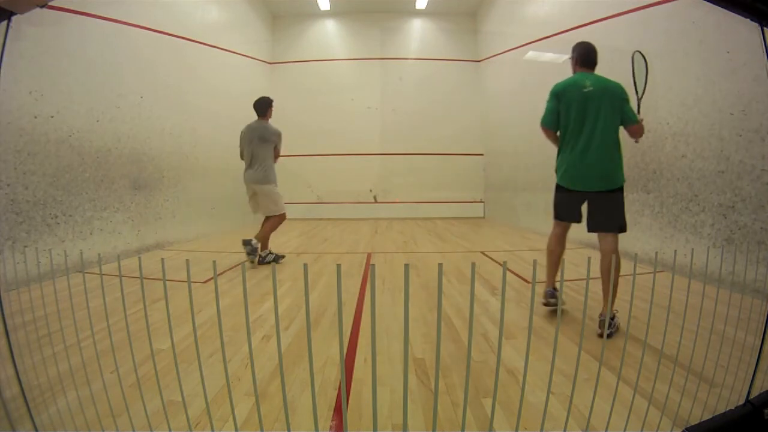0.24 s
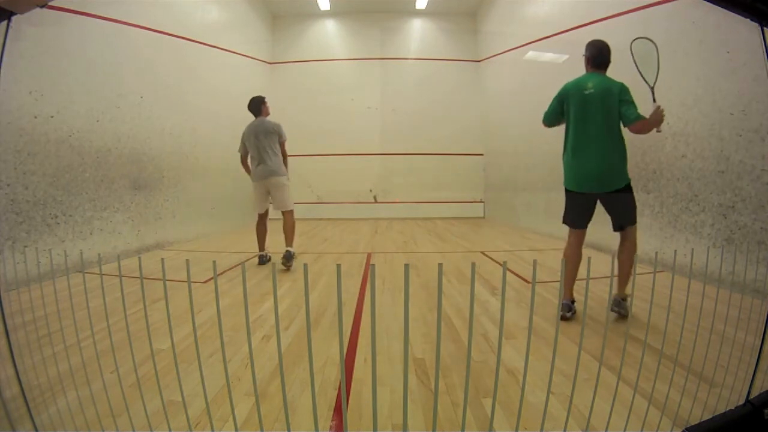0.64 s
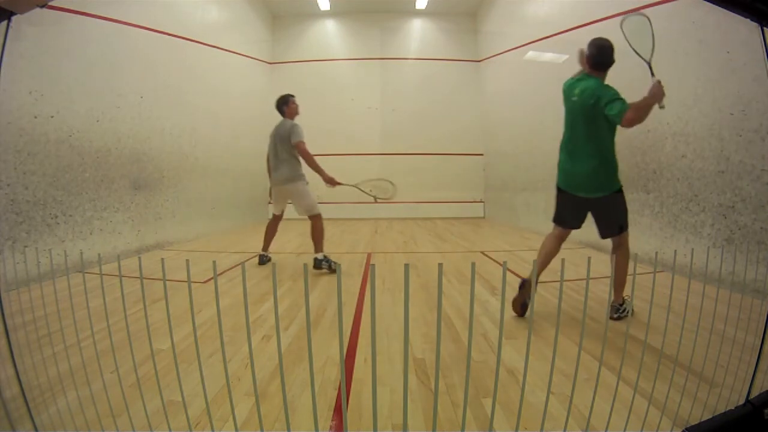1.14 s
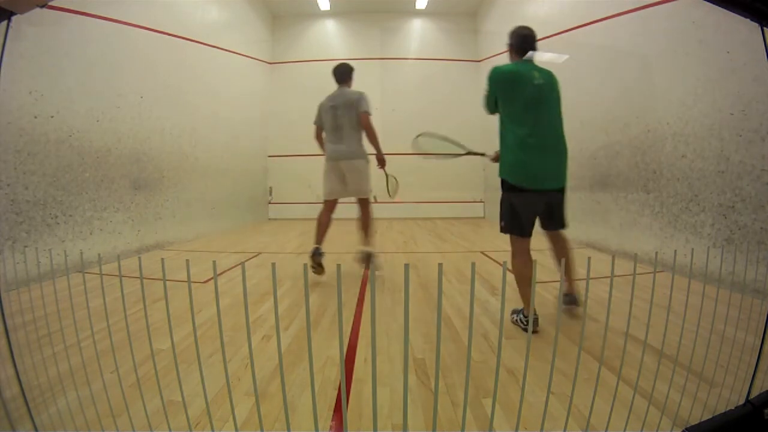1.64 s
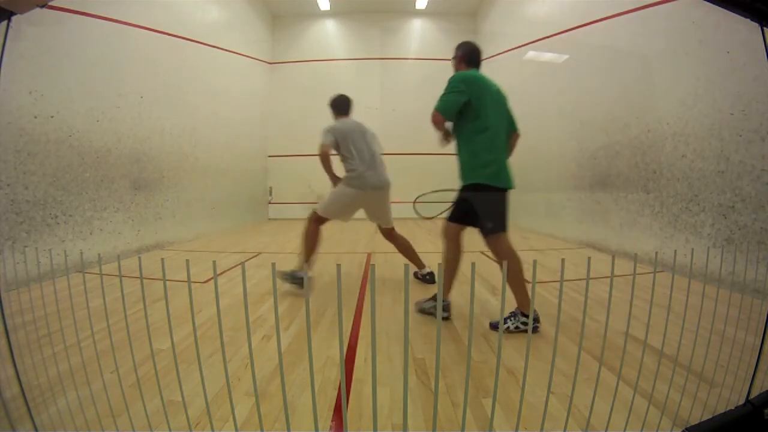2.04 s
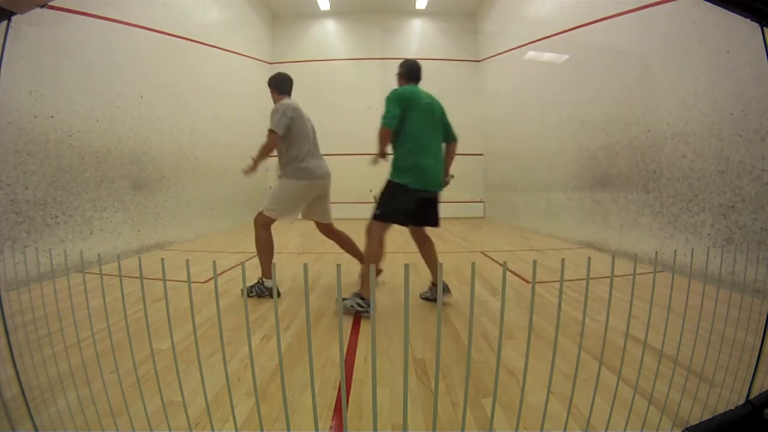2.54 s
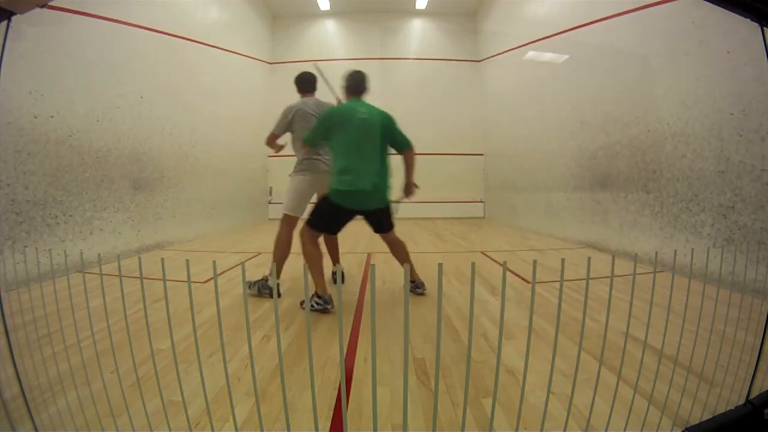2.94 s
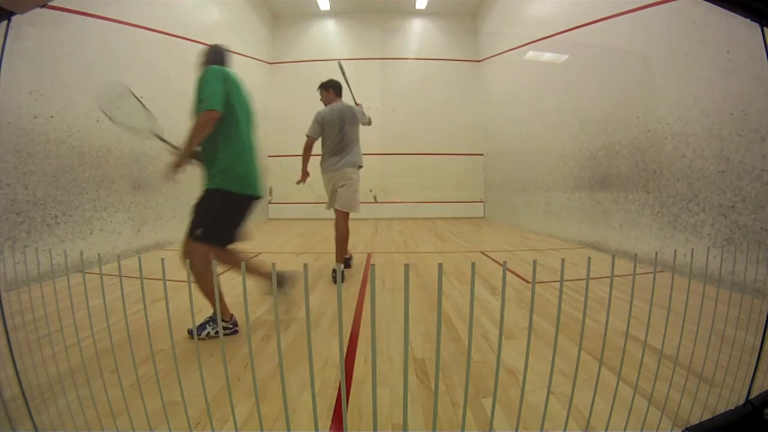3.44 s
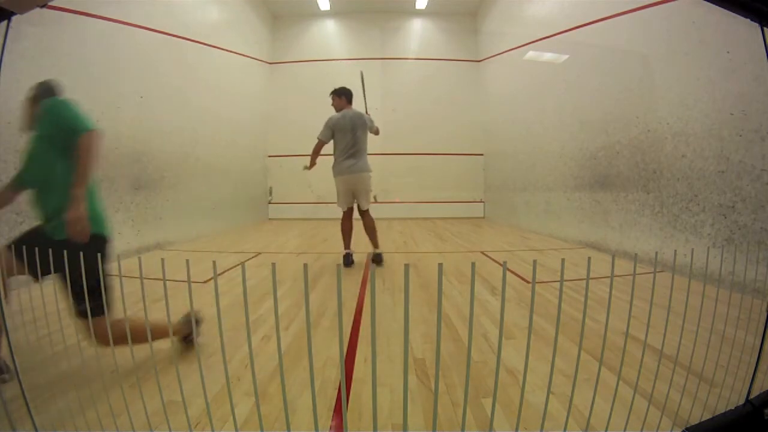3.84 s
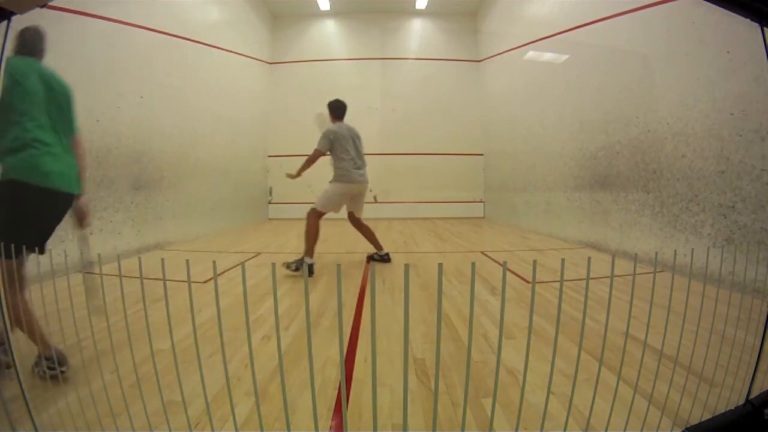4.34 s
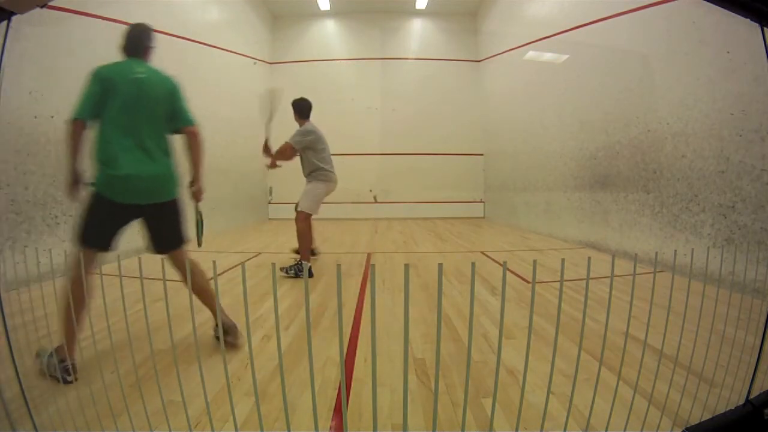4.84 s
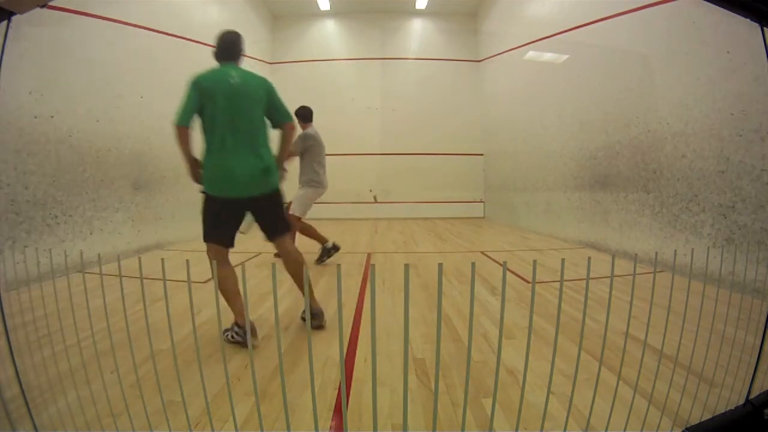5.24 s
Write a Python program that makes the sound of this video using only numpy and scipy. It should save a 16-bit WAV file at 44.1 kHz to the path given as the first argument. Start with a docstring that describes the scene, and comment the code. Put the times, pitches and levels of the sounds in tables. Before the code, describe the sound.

Squash rally in a hard, echoing court: ringing racket hits, loud wall smacks, shoe squeaks and floor thuds over dull ventilation, boxy sound.

```python
"""A hard, enclosed squash court during a rally, heard from behind the back wall by a small camera in a plastic case.
Racket strokes ring at string and frame resonances; each is followed by the ball's smack on the front wall.
Shoes thud as filtered noise bursts on the wooden floor and squeak as gliding stick-slip notes.
Blows and shoes excite a diffuse tail that dies over two to three seconds, above a steady noise of ventilation.
The case adds a honking resonance, and a slow sample-and-hold converter adds a glassy mirrored treble."""
import sys
import numpy as np
from scipy import signal
from scipy.fft import rfft, irfft
from scipy.io import wavfile
from scipy.ndimage import uniform_filter1d

SR = 44100
rng = np.random.default_rng(int(sys.argv[2]) if len(sys.argv) > 2 else 0)


def log_audio(samples):
    """Write samples as a 16-bit WAV file to the path given in sys.argv[1]."""
    # one column per channel
    frames = np.atleast_2d(samples).T
    # limit to full scale, then quantise
    limited = np.clip(frames, -1, 1)
    pcm = np.round(limited * 32767).astype(np.int16)
    wavfile.write(sys.argv[1], SR, pcm)


N = 242550
THUD_HZ, THUD_WIDTH_HZ = 314, 395  # the ball's hollow thud
COURT_WIDTH_M, COURT_LENGTH_M = 6.2, 10.1
SOUND_M_S = 343
SPECTRUM_SIZE = 2 ** 19
FREQ = np.maximum(np.arange(SPECTRUM_SIZE // 2 + 1) * SR / SPECTRUM_SIZE, 1)
TIME = np.arange(N) / SR


def undb(db):
    """Logarithmic level: decibels become an amplitude gain."""
    return 10 ** (np.asarray(db) / 20)


def curve(points, hz=FREQ):
    """Logarithmic pitch scale: join (Hz, value) points by straight lines over log frequency."""
    point_hz, value = np.transpose(points)
    return np.interp(np.log(hz), np.log(point_hz), value)


def bump(hz, width_hz, db):
    """Resonance: a peak (or dip) in dB that falls to half its height at half the width from its centre."""
    return db / (1 + (2 * (FREQ - hz) / width_hz) ** 2)


def tilt(db_per_octave):
    """Spectral slope: brighten or dull the treble above 2 kHz."""
    return db_per_octave * np.log2(np.maximum(FREQ / 2000, 1))


def colour(x, db):
    """Minimum phase: folding the cepstrum makes a causal filter with the given dB curve."""
    cepstrum = irfft(np.log(undb(db[::128])))
    half = len(cepstrum) // 2
    cepstrum[1:half] *= 2
    cepstrum[half + 1:] = 0
    response = irfft(np.exp(rfft(cepstrum)))
    return signal.oaconvolve(x, response)[:len(x)]


def add(out, start_s, x):
    """Superposition: mix x into out from start_s."""
    i = max(int(start_s * SR), 0)
    out[i:i + len(x)] += x[:N - i]


def ventilation():
    """Broadband flow noise: white noise shaped into a dull, steady rush of air."""
    # spectrum of the air noise: hz, level_db
    air = [(20, -44), (45, -35), (90, -31.5), (160, -33), (300, -44), (600, -45.5), (1200, -55),
           (2400, -58.5), (5500, -55.5)]
    return colour(rng.standard_normal(N), curve(air))


def reverb(build_s):
    """Diffuse reverberation: random echoes thicken with time and each band decays at its own rate."""
    # reverberation time of the court by band: hz, t60_s
    court_t60 = [(100, 2.9), (350, 1.96), (900, 2.86), (2200, 2.42), (3800, 2.2), (6000, 1.7)]
    t = TIME[:2 ** 17]
    # sparse pulses at first, then dense, at constant average power
    chance = np.minimum(.1 + (t / .25) ** 2, 1)
    signs = np.sign(rng.standard_normal(len(t)))
    present = rng.random(len(t)) < chance
    echoes = rfft(signs * present / np.sqrt(chance))
    hz = np.maximum(np.arange(len(echoes)) * SR / len(t), 1)
    centres, t60s = np.transpose(court_t60)
    tail = 0
    # each row of the identity opens one band, crossfading into its neighbours
    for share, t60 in zip(np.eye(len(centres)), t60s):
        rate = np.log(1000) / t60
        band = irfft(echoes * np.interp(np.log(hz), np.log(centres), share))
        tail = tail + band * np.exp(-rate * t) * np.sqrt(2 * rate / SR)
    return tail * (1 - np.exp(-t / build_s))


def arrivals(straight_db, across_db, along_db, count=2):
    """Specular reflection: (delay_s, level_db) of straight, near-surface and fluttering paths."""
    near_bounce_s, near_bounce_db = .0065, -7  # against the straight path
    flutter_db = -1.5  # change with each further trip between facing walls
    paths = [(0, straight_db), (near_bounce_s, straight_db + near_bounce_db)]
    for k in range(count):
        paths.append(((k + 1) * COURT_WIDTH_M / SOUND_M_S, across_db + k * flutter_db))
        paths.append(((k + 1) * 2 * COURT_LENGTH_M / SOUND_M_S, along_db + k * flutter_db))
    return paths


def blow(paths, build_s, surge_db, surge_s=0.029, smear_s=0.0022):
    """Room impulse response: a few brief arrivals, a surge of early echoes and the long tail."""
    sound = reverb(build_s)
    sound *= 1 + undb(surge_db) * np.exp(-TIME[:len(sound)] / surge_s)
    t = TIME[:SR // 50]
    for delay_s, db in paths:
        # each arrival is a brief cluster of close reflections with a softened start
        cluster = rng.standard_normal(len(t)) * t * np.exp(-t / smear_s)
        add(sound, delay_s, undb(db) * cluster / np.linalg.norm(cluster))
    return sound


def rackets(echo_cluster_db=-12, echo_tilt_db=-2.0):
    """Impact and modal ringing: the ball pocks off strings and frame, and the front wall returns an echo."""
    # racket strokes: start_s, level_db, straight_path_db, string_ring_db, body_db, thud_db,
    # treble_tilt_db_per_octave, build_up_s, echo_delay_s, echo_db (against the stroke)
    strokes = [(0.040, -10.5, -24, 6.5, 0, 2.5, -1.5, 0.006, 0.038, 2.5),
               (1.461, 3.5, -24, 10.5, 5, -5.5, 0.5, 0.016, 0.059, 4),
               (2.535, 1.5, -15, 4.5, 9, 0, -3.5, 0.028, .044, -0.5),
               (3.959, -8, -11, 17, 11, 5, 3.5, 0.0016, .06, 1.5),
               (5.284, 5, -13, 6, 6, -5.5, -0.5, 0.0048, 0.032, .5)]
    # spectrum common to all strokes: hz, level_db
    stroke_colour = [(60, -5.5), (170, 4), (270, 3), (450, 1), (750, -0.5), (1350, 0), (1800, -1),
                     (2200, -2), (2550, -0.5), (2900, -0.5), (3500, -2.5), (4500, -5.5), (5200, -0.5),
                     (6000, -2)]
    string_hz, string_width_hz = 1068, 58
    body_hz, body_width_hz = 776, 170  # the racket's frame
    out = np.zeros(N)
    for (start_s, db, straight_db, ring_db, body_db, thud_db,
         tilt_db, build_s, echo_s, echo_db) in strokes:
        shape = curve(stroke_colour) + tilt(tilt_db)
        shape += bump(string_hz, string_width_hz, ring_db)
        shape += bump(body_hz, body_width_hz, body_db)
        shape += bump(THUD_HZ, THUD_WIDTH_HZ, thud_db)
        paths = arrivals(straight_db, across_db=-15.5, along_db=-16)
        stroke = blow(paths, build_s, surge_db=-1.5)
        add(out, start_s, undb(db) * colour(stroke, shape))
        # the long way round dulls the echo
        echo = blow([(0.0026, echo_cluster_db)], build_s=0.0037, surge_db=-3, surge_s=0.02)
        echo = colour(echo, shape + tilt(echo_tilt_db))
        add(out, start_s + echo_s, undb(db + echo_db) * echo)
    return out


def front_wall(thud_loss_per_db=0.68, surge_db=-3.0, surge_loss_per_db=1.8):
    """Panel resonance: each smack of the ball has one strong pitch and a band elsewhere that is no stronger."""
    # ball on the front wall: start_s, level_db, panel_hz, panel_width_hz, panel_db,
    # weak_band_hz, weak_band_db, treble_tilt_db_per_octave
    smacks = [(0.345, 1, 1053, 168, 10, 854, -4.5, 1), (1.679, 17.5, 770, 396, 6, 1417, -21.5, -4.5),
              (2.767, 9.5, 734, 170, 10.5, 1030, -9.5, 0.5), (4.381, -0.5, 1063, 175, 8.5, 850, -3, -1),
              (5.450, 11, 803, 203, 8.5, 1200, -6, 0)]
    # spectrum common to all smacks: hz, level_db
    smack_colour = [(60, -17), (180, -4.5), (260, 4.5), (400, 2.5), (750, 0), (1300, 1.5), (1700, 4),
                    (2200, 1), (3300, -1), (5500, -1)]
    out = np.zeros(N)
    paths = arrivals(straight_db=-12.0, across_db=-13, along_db=-15.5)
    for start_s, db, panel_hz, width_hz, panel_db, weak_hz, weak_db, tilt_db in smacks:
        shape = curve(smack_colour) + tilt(tilt_db)
        shape += bump(panel_hz, width_hz, panel_db)
        shape += bump(weak_hz, width_hz=275, db=weak_db)
        # slow, quiet balls thud and die back quickly; fast, loud ones crack and fill the court
        shape += bump(THUD_HZ, THUD_WIDTH_HZ, -thud_loss_per_db * db)
        sound = blow(paths, build_s=0.0057, surge_db=surge_db - surge_loss_per_db * db)
        add(out, start_s, undb(db) * colour(sound, shape))
    return out


def slip(length_s, hz, glide, wobble, rasp=0.16):
    """Stick-slip friction: rubber grips and slips thousands of times a second on an unsteady, gliding note."""
    n = int(length_s * SR)
    unsteady = uniform_filter1d(rng.standard_normal(SR // 2), size=50)
    pitch = hz * (1 + glide * np.linspace(-.5, .5, n))
    pitch = pitch * (1 + wobble * unsteady[:n] / unsteady.std())
    note = np.sin(2 * np.pi * np.cumsum(pitch) / SR) * signal.windows.tukey(n, .5)
    # the grip is uneven, so the note rasps
    grip = uniform_filter1d(rng.standard_normal(SR // 2), size=70)
    return note * (1 + rasp * grip[:n] / grip.std())


def squeaks(straight_db=-6, flutter_db=-9):
    """Stick-slip in a live room: soles scuff in on a rising note, bite on a clean one and skid out roughly."""
    # shoe squeaks: bite_start_s, pitch_hz, scuff_db, bite_length_s, bite_db, skid_pitch_hz, skid_db
    squeak_events = [(0.769, 3925, -33, 0.014, -20, 3840, -44), (1.801, 5138, -29, 0.073, -35, 5270, -39),
                     (2.501, 4344, -36.5, 0.011, -27, 4900, -36.5),
                     (2.546, 4220, -35, 0.021, -34, 3210, -44.5),
                     (2.772, 3593, -33, 0.023, -28, 4225, -28.5),
                     (5.046, 5796, -36.5, .0094, -24.5, 5950, -52),
                     (5.294, 4450, -39.5, 0.018, -37, 4200, -39)]
    # glide and wobble are shares of the pitch
    scuff_s, scuff_glide, scuff_wobble = .04, 0.054, 0.026
    bite_glide, bite_wobble = -0.014, .015
    skid_s, skid_glide, skid_wobble = .065, -0.139, 0.0557
    out = np.zeros(N)
    for bite_start_s, hz, scuff_db, bite_s, bite_db, skid_hz, skid_db in squeak_events:
        stages = [(bite_start_s - scuff_s, scuff_db, slip(scuff_s, hz, scuff_glide, scuff_wobble)),
                  (bite_start_s, bite_db, slip(bite_s, hz, bite_glide, bite_wobble)),
                  (bite_start_s, skid_db, slip(skid_s, skid_hz, skid_glide, skid_wobble))]
        for start_s, db, note in stages:
            # the foot moves on, so each stage meets other echoes
            path = reverb(build_s=0.0018)
            path[0] += undb(straight_db)
            # a strong echo follows two round trips along the court
            path[int(2 * 2 * COURT_LENGTH_M / SOUND_M_S * SR)] += undb(flutter_db)
            add(out, start_s, undb(db) * signal.fftconvolve(note, path))
    return out


def footfalls(thud_s=0.069, room_db=-3):
    """Damped floor resonance: heels thump the sprung floor, which shudders briefly."""
    # footfalls: start_s, level_db, thump_hz
    steps = [(1.215, 2, 80.5), (2.50, 11, 110), (2.659, 11, 135), (2.777, 12.5, 100), (2.83, 7.5, 181),
             (3.101, -3, 82), (3.601, 15, 119), (3.699, 5.5, 143), (3.815, 14, 127), (3.875, 14, 123),
             (3.945, 12.5, 74), (5.079, 14.5, 110), (5.3, 9, 84)]
    out = np.zeros(N)
    for start_s, db, hz in steps:
        sound = undb(room_db) * reverb(build_s=0.037)
        shudder = rng.standard_normal(len(sound)) * np.exp(-TIME[:len(sound)] / thud_s)
        sound += shudder * np.sqrt(2 / (thud_s * SR))
        # the level falls on both sides of the thump's pitch, by 35 dB at most
        shape = -np.minimum(14 * np.log2(FREQ / hz) ** 2, 35)
        add(out, start_s, undb(db) * colour(sound, shape))
    return out


def scene():
    """Superposition: the ventilation and every sound of the rally sum to one channel."""
    return (ventilation() + rackets() + front_wall() + squeaks() + footfalls())[None]


def record(dry):
    """Cavity resonance and imaging: the case honks, and held samples mirror the middle range into the treble."""
    # response of the plastic case: hz, level_db
    case = [(40, -7), (150, -10.5), (400, -3), (580, -10), (740, -3), (1400, -1), (1950, -1), (2550, -2),
            (2900, -7.5), (3250, 1.5), (3800, 0), (4400, -10), (5300, -6.5), (6000, -18.5)]
    converter_hz, top_hz = 12000, 15500
    cavity = bump(hz=2239, width_hz=306, db=13.5)
    boxed = colour(dry[0], curve(case) + cavity)
    padded = np.pad(boxed, (0, N))
    samples = signal.resample(padded, round(len(padded) * converter_hz / SR))
    # each sample is held for four steps, which leaves mirror images about the converter's rate
    held = signal.resample(np.repeat(samples, 4), len(padded))[:N]
    low_pass = signal.ellip(12, .2, 80, top_hz, fs=SR, output="sos")
    return signal.sosfilt(low_pass, held)[None]


dry = scene()
out = record(dry)
log_audio(out)
```